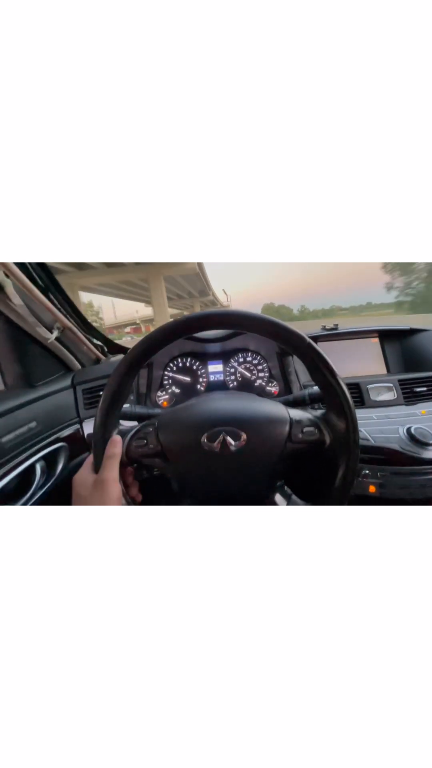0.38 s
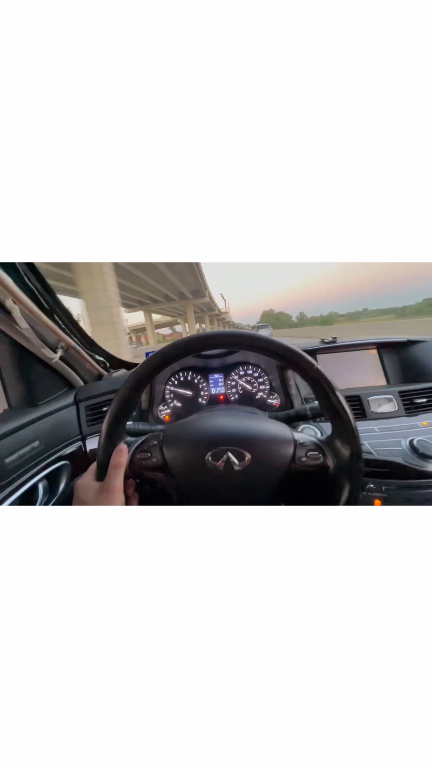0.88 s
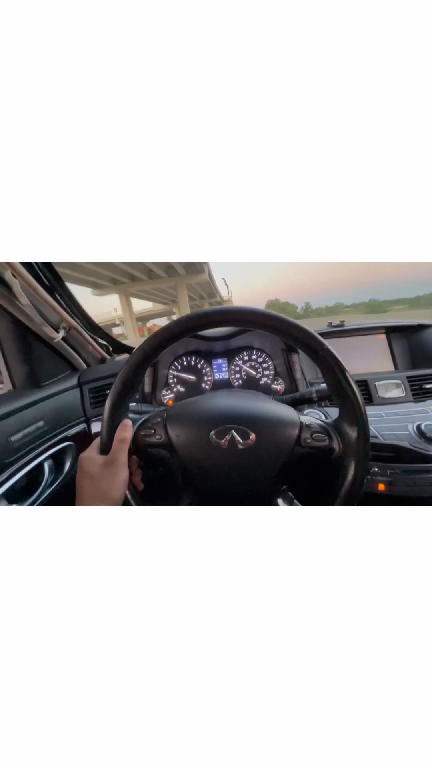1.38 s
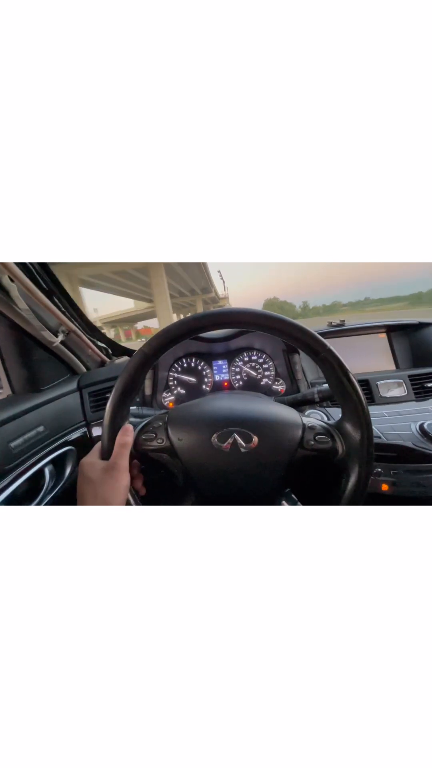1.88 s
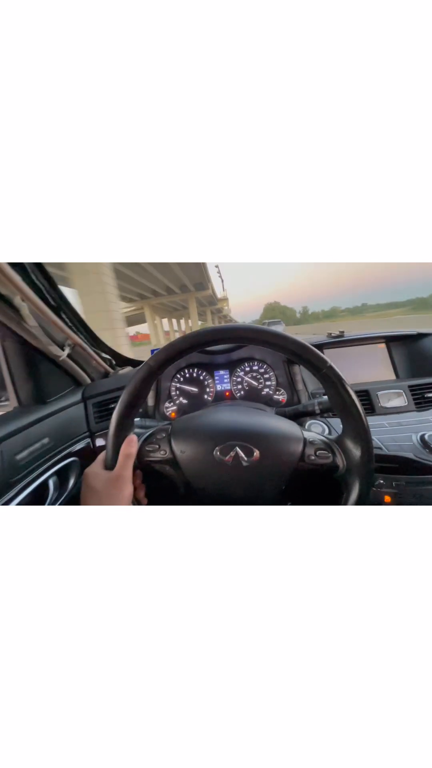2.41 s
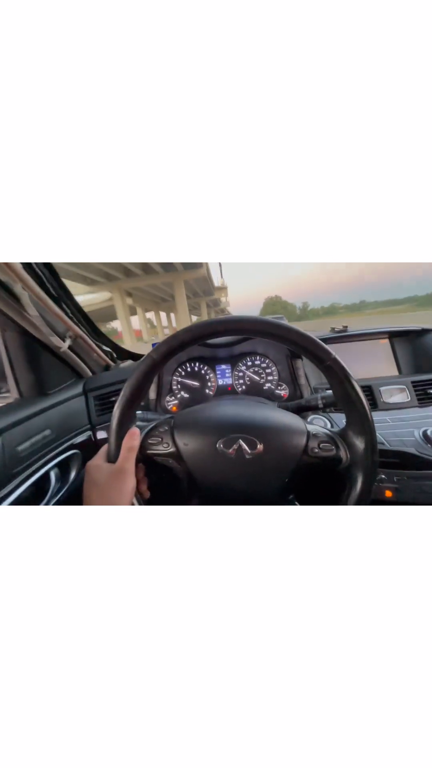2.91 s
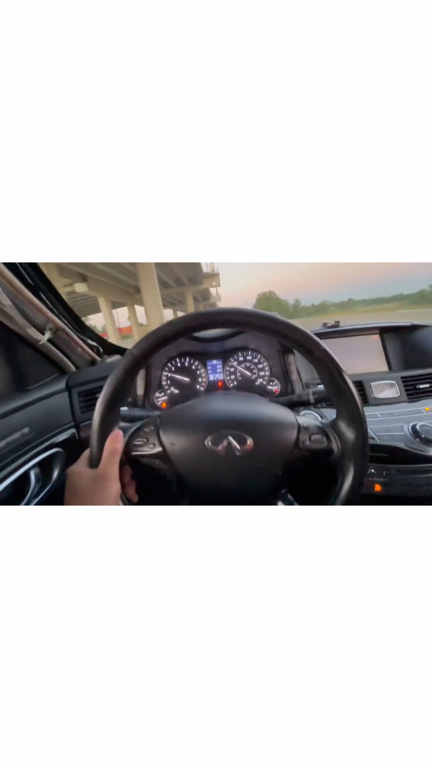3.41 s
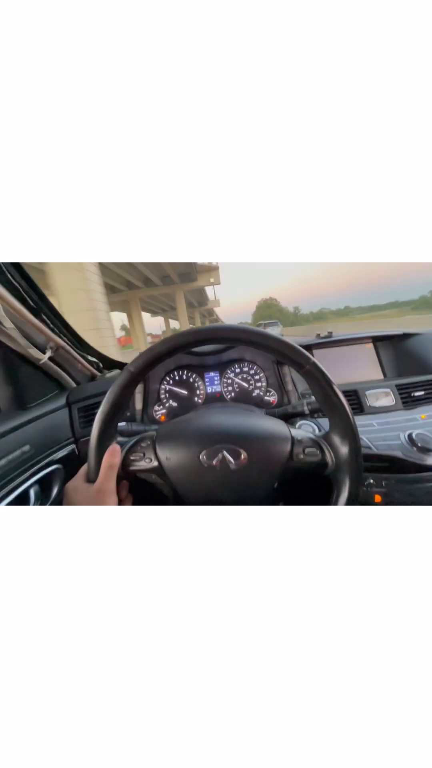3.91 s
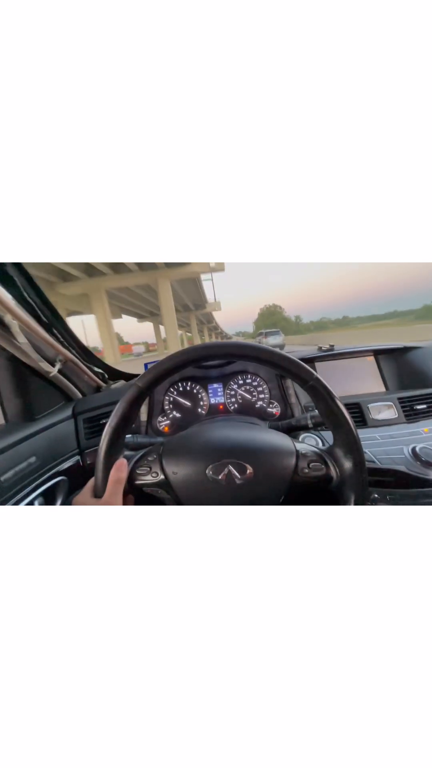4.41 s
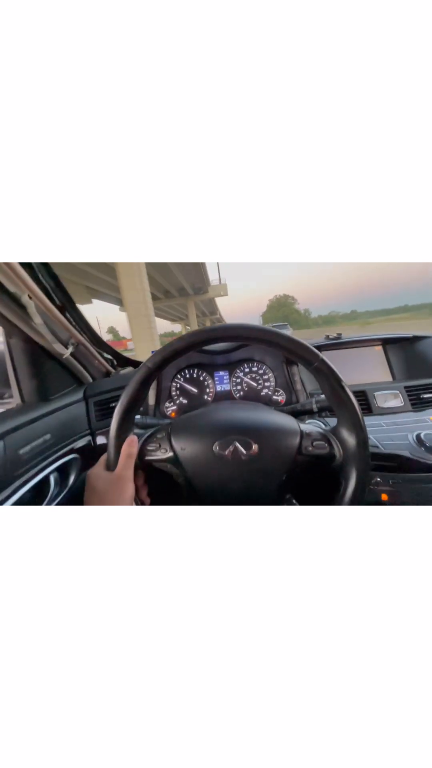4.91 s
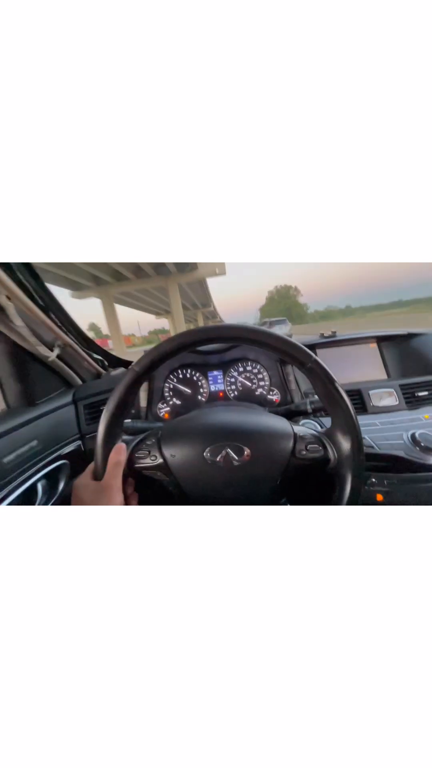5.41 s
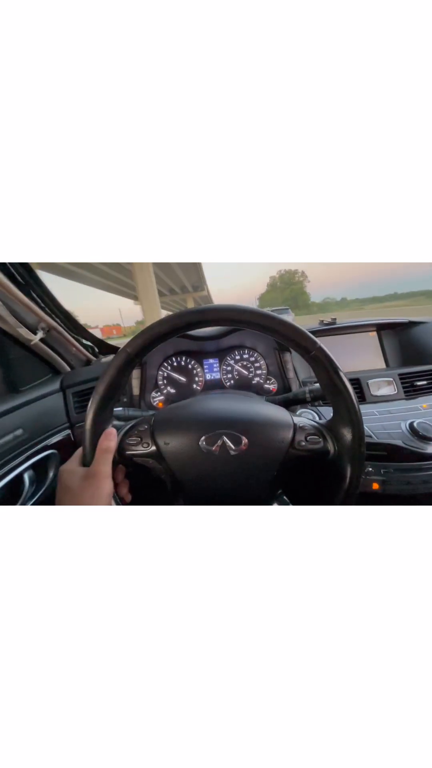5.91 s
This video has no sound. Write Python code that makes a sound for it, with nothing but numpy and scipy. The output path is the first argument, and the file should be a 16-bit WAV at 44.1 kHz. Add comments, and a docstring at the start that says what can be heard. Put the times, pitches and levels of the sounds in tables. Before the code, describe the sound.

Inside a moving car, a loud low exhaust drone holds steady, then climbs in pitch and strength over road rumble and wind hiss.

```python
"""The drone of a loud exhaust inside a car, rising in pitch, over rumble, roar and hiss from the road and wind.
A six-cylinder engine sounds as sines: firing note, overtones, and uneven-cylinder lines at every sixth of it.
Some high lines sing out for a while. Road and wind are filtered noise that swells at joints in the road.
A panel, one gliding sine, hums up briefly and beats with the drone; narrow noise bursts squeak faintly."""
import sys
import numpy as np
from scipy import signal
from scipy.fft import rfft, irfft, next_fast_len
from scipy.io import wavfile
from scipy.ndimage import uniform_filter1d, minimum_filter1d

SR = 44100
rng = np.random.default_rng(int(sys.argv[2]) if len(sys.argv) > 2 else 0)


def pcm_store(signal):
    """Save signal as 16-bit PCM."""
    levels = np.round(np.clip(np.atleast_2d(signal), -1, 1) * 32767)
    wavfile.write(sys.argv[1], SR, levels.astype(np.int16).T)


def invert_db(x):
    """Field ratio 10**(x/20) for x, a level in decibels (scalar or array-like)."""
    u = np.asarray(x, float) / 20
    return 10 ** u


N = 266805

# Engine speed. Each row: time in seconds, firings per second.
SPEED = [(0.0, 97.8), (0.4, 96.8), (0.8, 95.8), (1.0, 98.0), (1.25, 97.6), (1.6, 99.8), (1.85, 101.4),
         (2.02, 104.0), (2.24, 98.3), (2.42, 99.8), (2.7, 98.5), (3.0, 98.4), (3.27, 100.4), (3.46, 109.5),
         (3.7, 109.6), (3.97, 112.0), (4.27, 124.4), (4.65, 125.7), (5.3, 121.5), (6.05, 118.2)]
# Exhaust load, before resonances and waver. Each row: time in seconds, firing note in dB, its octave in dB,
# higher overtones in dB at 300 Hz, lines between them in dB at 300 Hz, brightness in dB per octave.
ENGINE_LOAD = [(0.0, -13, -18.5, -53, -55.5, -19), (0.4, -15, -23, -53.5, -53, -17.5),
               (0.8, -13, -22, -55.7, -54, -20), (1.0, -22, -23.5, -48, -51.5, -17.3),
               (1.25, -18.5, -27, -58, -56.2, -15.5), (1.6, -16.9, -22.5, -62, -51, -17.5),
               (1.85, -13.5, -28, -54.5, -47, -15.5), (2.02, -11.5, -29, -48, -46.5, -20.0),
               (2.24, -12, -33, -51, -45.5, -14.5), (2.42, -11, -22, -46, -45.5, -17.5),
               (2.7, -10.5, -27, -41, -45.5, -14.3), (3.0, -10.5, -24, -37.5, -49, -17),
               (3.27, -9.5, -32, -40.5, -46.7, -14), (3.46, -10, -29.5, -38.8, -44.5, -8),
               (3.7, -9.5, -27.5, -39.5, -46, -9.5), (3.97, -9.0, -24, -43.5, -49.5, -8.5),
               (4.27, -6, -19.5, -47.5, -47.5, 6.1), (4.65, -7.5, -25.5, -53.5, -54.5, 6),
               (5.3, -9.5, -22, -51, -48.5, 3.2), (6.05, -10, -18.5, -51, -49.4, -4)]
# Exhaust pipe and cabin resonances. Each row: centre in Hz, width in Hz, rise in dB.
PIPE_RESONANCES = [(131.0, 7.5, 18), (164.4, 13.0, 18.0), (170, 8.2, 8), (231.7, 61.7, 18.5),
                   (282.7, 19.3, 21), (327.7, 24, 10.5), (370.8, 21.8, 18.5), (412.7, 54.5, 22.0),
                   (445.0, 15.0, 11), (490, 48, 9), (621, 54, 14.5), (647.5, 17, 16.5), (713.6, 45, 20.5),
                   (764, 66, 10)]
# Level offsets in dB of lines one, two and three sixths of the firing note away from an overtone.
UNEVEN_DB = [-6.5, -16.5, -10]
# High lines that sing out. Each row: start in seconds, length in seconds, level in dB before waver.
SINGING = [(1.35, 0.83, -33), (1.6, .55, -29.5), (2.25, 1.3, -38.5), (3.4, 0.49, -33), (4.05, 0.45, -31),
           (2.15, 1.3, -27), (3.397, 0.85, -29.5), (4.603, 2, -33.5), (4.9, 0.76, -36)]
# Their multiples of the engine cycle rate, one per row above.
SINGING_MULTIPLES = [36, 42, 30, 27, 45, 23, 21, 24, 45]
# The two microphones. Each row: frequency in Hz, likeness of the road noise 0-1, lead of the left in radians,
# left minus right in dB for tones.
EARS = [(0, .97, 0, 0), (60, .96, .1, 0), (98, .9, .36, .3), (125, .85, .36, -2), (140, .7, .3, -2),
        (165, .7, .35, 5), (205, .77, .35, 6), (250, .78, .2, 2.5), (290, .75, .6, 4), (350, .6, 1.8, 6),
        (400, .65, 1.6, 4), (440, .55, 2.5, 9), (470, .4, 0, 4), (505, .35, 0, 3), (560, .6, 2.1, 5),
        (630, .65, 1.9, 4), (720, .8, 2.9, 8), (1150, .35, 2.8, 5), (1650, .82, 3.3, 0),
        (2800, .35, 7.2, 0), (4900, .38, 12.6, 0), (6300, .5, 12.8, 0), (7500, .4, 15.5, 0),
        (9200, .2, 19.0, 0), (10200, .25, 19.0, 0), (11000, .98, 18.85, 0)]
# Road and wind before patches, joints and rasp. Each row: time in seconds, rumble in dB, low roar in dB,
# upper roar in dB, hiss in dB.
ROAD_LEVELS = [(0, -28, -25.5, -32, -29.5), (.3, -24, -26.5, -30, -30.5), (.7, -21, -26, -30.5, -30),
               (1.2, -21, -26, -32, -31.5), (1.7, -24, -26.5, -30, -31), (2.1, -26, -25, -33, -31.5),
               (2.8, -24, -27, -29, -30), (3.3, -23, -23.5, -26, -30), (3.7, -23.5, -25, -26.5, -28.5),
               (4.05, -21.5, -24, -24.5, -29.5), (4.36, -31.5, -28, -23, -26),
               (4.6, -31, -28.5, -26, -28.5), (4.8, -28.5, -29.5, -31, -31), (5.5, -27, -28, -27, -30),
               (6.05, -28, -27, -24, -30.5)]
# Relative noise spectrum before cabin resonances. Each row: frequency in Hz, left in dB per Hz, right in dB per Hz.
ROAD_COLOUR = [(15, -26.5, -27.5), (24, -20, -20.5), (44, -6, -5), (67, -4.5, -4.5), (89.5, -6.5, -14),
               (150, -8.5, -7.5), (198, -4.5, -13.5), (337, -10, -12), (560, -13.5, -19), (820, -15, -22.5),
               (1110, -17, -21), (1680, -19.5, -17.5), (2470, -26.5, -25), (3220, -31, -31),
               (3900, -33.5, -34.5), (5330, -36, -39), (6700, -33, -42), (8600, -45.5, -47.5),
               (9950, -49, -45.5), (12900, -69, -53.5)]
# Cabin resonances in the road noise. Each row: centre in Hz, width in Hz, rise in dB.
CABIN_RESONANCES = [(776, 320, 7.5), (900, 69, 7), (1283, 200, 3), (1650, 93, 3.5), (1874, 81, 5),
                    (2137, 32, 5), (6420, 76, -0.5)]
# Wheels thump over joints in the road. Each row: start in seconds, length in seconds, peak rise of the
# rumble in dB, peak rise of the low roar in dB.
BUMPS = [(0.412, 0.2, 1, 3), (0.873, .2, 6.5, 3.5), (1.844, 0.18, 4, 4), (4.044, .12, 0, 1.5)]
# Panel hum just above the drone. Each row: time in seconds, frequency in Hz, level in dB.
PANEL = [(4.9, 136, -46), (5.05, 134.8, -19.5), (5.2, 136.6, -21), (5.35, 130, -21), (5.45, 133.6, -34),
         (5.6, 128.6, -58)]
# Treble squeaks and rustles. Each row: start in seconds, length in seconds, centre in Hz, width in Hz,
# peak level in dB midway between left and right.
SQUEAKS = [(0.042, 0.052, 6680, 200, -47), (.19, .11, 4350, 698, -45), (0.217, 0.079, 5900, 900, -47),
           (0.455, 0.11, 4900, 200, -52), (3.008, 0.069, 6110, 200, -47), (4.779, 0.37, 4120, 150, -54),
           (5.487, 0.23, 4630, 300, -50)]

LOWEST_LINE, HIGHEST_LINE = 7, 49  # multiples of the cycle rate
RUMBLE_TOP_HZ, ROAR_SPLIT_HZ, HISS_FROM_HZ, WIND_FROM_HZ = 90, 355, 1132, 3315
WIND_UNDER_HISS_DB = 13.0
RASP_DEPTH = 0.35  # share by which each firing pulses the upper roar
CEILING = 0.935


def rms_one(x):
    """Scale to rms 1."""
    return x / np.sqrt(np.mean(x ** 2) + 1e-20)


def in_time(rows):
    """One curve per column, joined by straight lines."""
    time_s, *columns = np.transpose(rows)
    return [np.interp(np.arange(N) / SR, time_s, column) for column in columns]


def half_sine(start_s, length_s):
    """One arch from 0 to 1 and back, zero elsewhere."""
    return np.sin(np.pi * np.clip((np.arange(N) / SR - start_s) / length_s, 0, 1))


def resonance_db(hz, rows):
    """Summed rise of bell-shaped resonances."""
    return sum(rise_db / (1 + (2 * (hz - peak_hz) / width_hz) ** 2) for peak_hz, width_hz, rise_db in rows)


def drift(rate_hz, count):
    """Slow chance curves of rms 1: noise at every 64th sample through a double one-pole low-pass."""
    pole = np.exp(-128 * np.pi * rate_hz / SR)
    noise = rng.standard_normal((count, N // 64 + 1002))
    slow = signal.lfilter([1], [1, -2 * pole, pole * pole], noise)[:, 1000:]  # drop the settling
    return [np.interp(np.arange(N) / 64, np.arange(len(row)), rms_one(row)) for row in slow]


def tone(hz, level_db, wobble_rad=0, skew_rad=0):
    """A sine of given rms level on the left; the right differs in phase and level by frequency."""
    at_hz, _, lead_rad, left_db = np.transpose(EARS)
    phase = (2 * np.pi * np.cumsum(hz) / SR + wobble_rad) % (2 * np.pi)
    lead_rad = np.interp(hz, at_hz, lead_rad) + skew_rad
    left_db = np.interp(hz, at_hz, left_db)
    left, right = np.float32([phase + lead_rad, phase])
    return np.sqrt(2) * np.array([invert_db(level_db) * np.sin(left), invert_db(level_db - left_db) * np.sin(right)])


def engine(waver_db=2.0, shake_rad=0.4, skew_rad=0.5, note_waver_db=0.4, overtone_shake_rad=0.2):
    """Firing note and overtones hold nearly steady; lines between vary as combustion does from cycle to cycle."""
    firing_hz, = in_time(SPEED)
    note_db, octave_db, overtones_db, between_db, brightness_db = in_time(ENGINE_LOAD)
    out = tone(firing_hz, note_db + note_waver_db * drift(3.4, count=1)[0])
    multiples = range(LOWEST_LINE, HIGHEST_LINE + 1)
    lines = len(multiples)
    swells, wobbles, turns = drift(1.86, count=lines), drift(3.6, count=lines), drift(0.4, count=lines)
    starts_rad = rng.uniform(0, 2 * np.pi, lines)
    for multiple, swell, wobble, turn, start_rad in zip(multiples, swells, wobbles, turns, starts_rad):
        hz = multiple * firing_hz / 6
        sixths_away = min(multiple % 6, -multiple % 6)  # from the nearest overtone
        level_db = (between_db if sixths_away else overtones_db) + brightness_db * np.log2(hz / 300)
        level_db = level_db + resonance_db(hz, PIPE_RESONANCES)
        if sixths_away:
            height = np.minimum(hz / 400, 2)  # timing jitter and extra paths blur higher lines more
            level_db = level_db + UNEVEN_DB[sixths_away - 1] + waver_db * swell
            phase_rad = start_rad + shake_rad * (0.5 + height) * wobble
            out += tone(hz, level_db, phase_rad, skew_rad * turn * np.minimum(height, 1))
        else:
            level_db = octave_db if multiple == 12 else level_db  # octave level includes resonance
            out += tone(hz, level_db + note_waver_db * swell, start_rad + overtone_shake_rad * wobble)
    return out


def singing():
    """A few high engine lines swell and fade, shaking in level and phase."""
    firing_hz, = in_time(SPEED)
    out = 0
    wobbles = drift(3.0, count=len(SINGING))
    for (start_s, length_s, level_db), multiple, wobble in zip(SINGING, SINGING_MULTIPLES, wobbles):
        swell = np.sqrt(np.abs(half_sine(start_s, length_s)))
        out = out + swell * tone(multiple * firing_hz / 6, level_db + 2.5 * wobble, multiple / 40 * wobble)
    return out


def road_levels():
    """Joints lift rumble and low roar; firings pulse the upper roar; wind follows the hiss."""
    rumble_db, low_db, upper_db, hiss_db = in_time(ROAD_LEVELS)
    for start_s, length_s, rumble_rise_db, low_rise_db in BUMPS:
        swell = half_sine(start_s, length_s)
        rumble_db = rumble_db + rumble_rise_db * swell
        low_db = low_db + low_rise_db * swell
    firing_hz, = in_time(SPEED)
    pulse = np.sin(2 * np.pi * np.cumsum(firing_hz) / SR)
    upper_db = upper_db + 20 * np.log10(1 + RASP_DEPTH * pulse)
    return rumble_db, low_db, upper_db, hiss_db, hiss_db - WIND_UNDER_HISS_DB


def road(patchy_db=(1.1, 1.1, 1.1, 0.9, 0.9)):
    """Tyre and wind noise, partly shared by both microphones, in five ranges of separate level."""
    size = next_fast_len(N)
    hz = np.arange(size // 2 + 1) * SR / size
    ear_hz, alike, lead_rad, _ = np.transpose(EARS)
    alike = np.clip(np.interp(hz, ear_hz, alike), 0, 1)
    lead_rad = np.interp(hz, ear_hz, lead_rad)
    shared, own = rfft(rng.standard_normal((2, size)))
    left = (alike * shared + np.sqrt(1 - alike ** 2) * own) * np.exp(1j * lead_rad)
    at_hz, *colour_db = np.transpose(ROAD_COLOUR)
    colour = [invert_db(np.interp(np.log(hz + 1), np.log(at_hz), side_db)) for side_db in colour_db]
    both = np.array([left, shared]) * colour
    both *= invert_db(resonance_db(hz, CABIN_RESONANCES))
    edges_hz = (RUMBLE_TOP_HZ, ROAR_SPLIT_HZ, HISS_FROM_HZ, WIND_FROM_HZ)
    below = [1 / (1 + (hz / edge_hz) ** 8) for edge_hz in edges_hz]
    shares = [below[0], below[1] - below[0], below[2] - below[1], below[3] - below[2], 1 - below[3]]  # of power
    out = 0
    for share, level_db, depth_db, patch in zip(shares, road_levels(), patchy_db, drift(8.8, count=5)):
        noise = rms_one(irfft(both * np.sqrt(np.abs(share)), size)[:, :N])
        out = out + invert_db(level_db + depth_db * patch) * noise
    return out


def panel():
    """A sine hum about ten hertz above the drone, close enough to beat with it."""
    hz, level_db = in_time(PANEL)
    return tone(hz, level_db)


def squeaks():
    """Short swells of noise in a narrow treble band, a little to the left."""
    out = np.zeros(N)
    for start_s, length_s, hz, width_hz, level_db in SQUEAKS:
        band = signal.butter(2, [hz - width_hz / 2, hz + width_hz / 2], "band", fs=SR, output="sos")
        noise = rms_one(signal.sosfilt(band, rng.standard_normal(N)))
        out += invert_db(level_db) * half_sine(start_s, length_s) * noise
    return out * invert_db(np.array([[2.0], [-2.0]]))


def scene():
    """Engine, singing lines, road, panel and squeaks together."""
    return engine() + singing() + road() + panel() + squeaks()


def low_pass(x):
    """Removes everything above the highest recorded frequency."""
    return signal.sosfilt(signal.butter(12, 12940, fs=SR, output="sos"), x)


def record(dry):
    """A look-ahead limiter smoothly ducks peaks above the ceiling."""
    over = np.maximum(np.abs(dry).max(axis=0) / CEILING, 1)
    gain = uniform_filter1d(minimum_filter1d(1 / over, size=401), size=401)
    return low_pass(dry * gain)


dry = scene()
out = record(dry)
pcm_store(out)
```